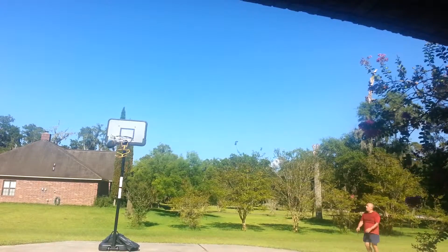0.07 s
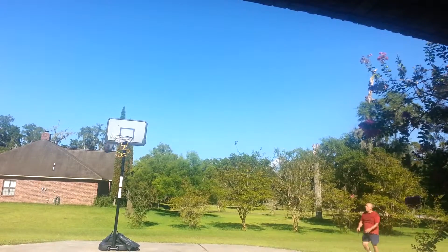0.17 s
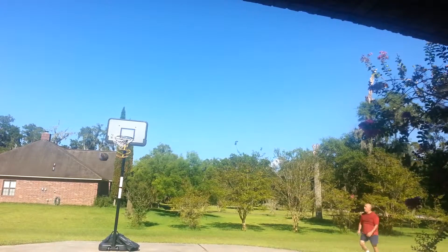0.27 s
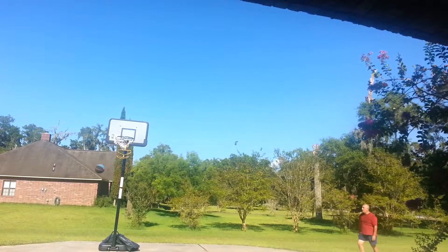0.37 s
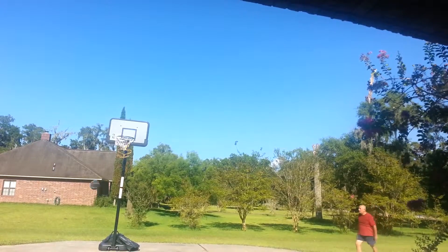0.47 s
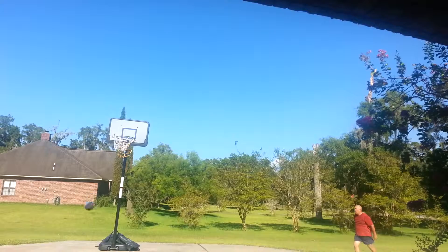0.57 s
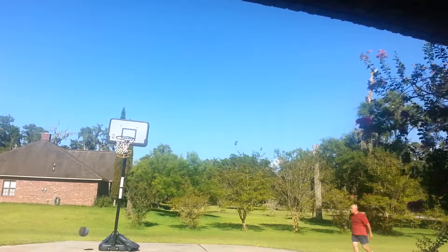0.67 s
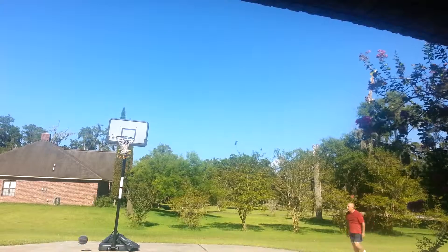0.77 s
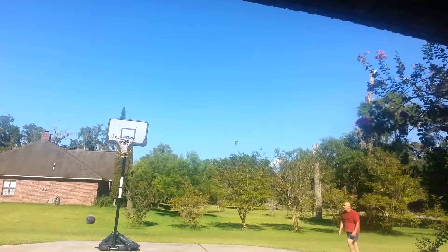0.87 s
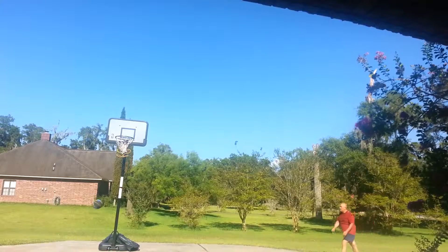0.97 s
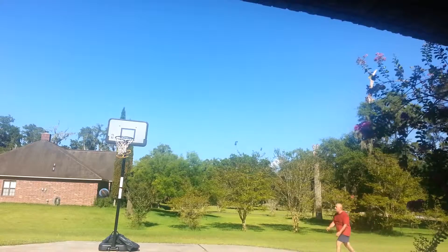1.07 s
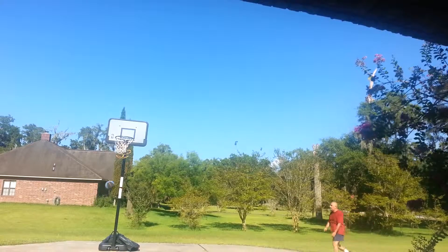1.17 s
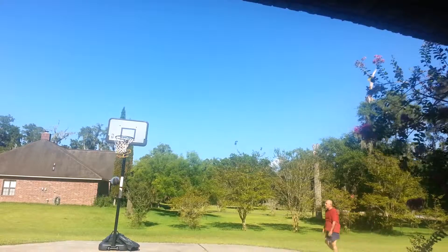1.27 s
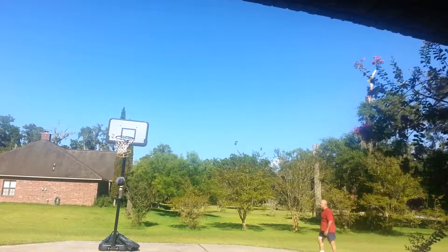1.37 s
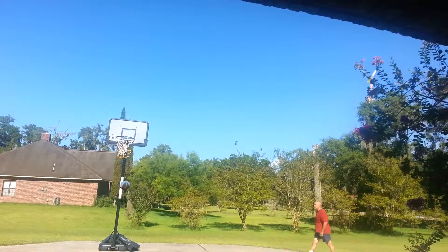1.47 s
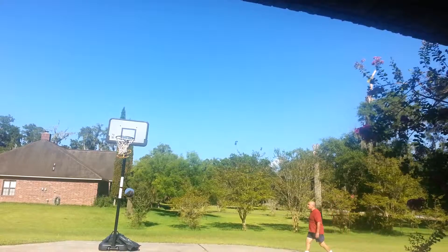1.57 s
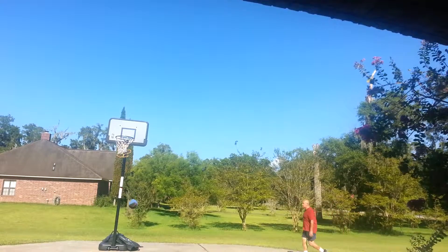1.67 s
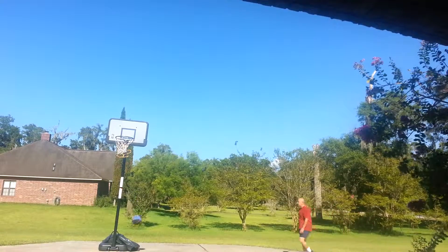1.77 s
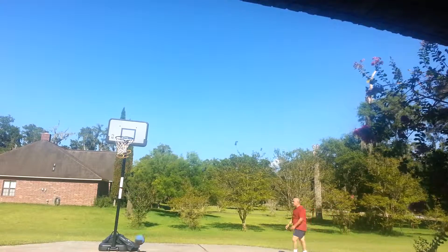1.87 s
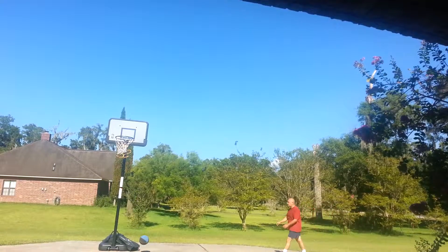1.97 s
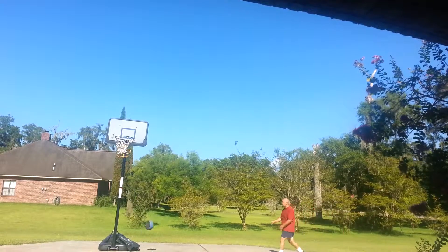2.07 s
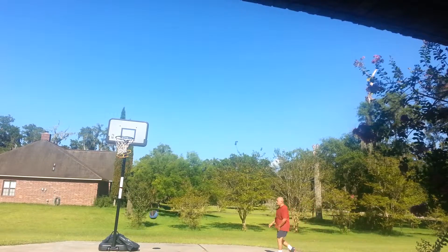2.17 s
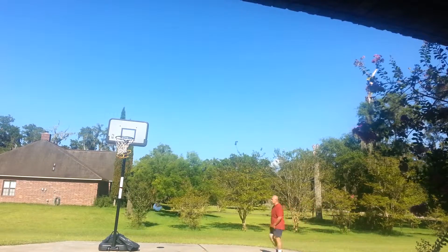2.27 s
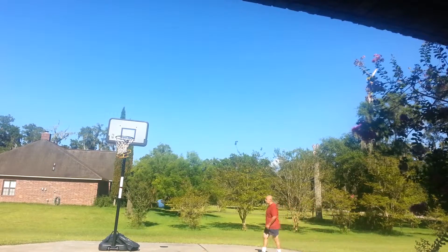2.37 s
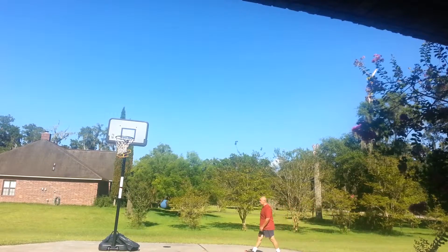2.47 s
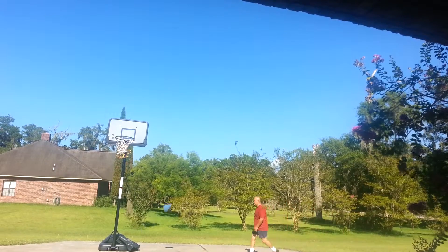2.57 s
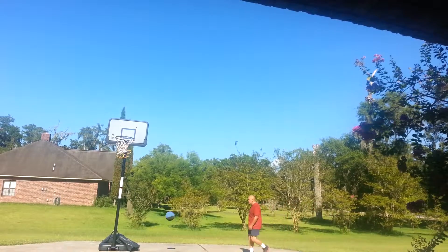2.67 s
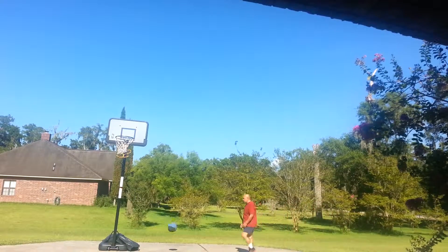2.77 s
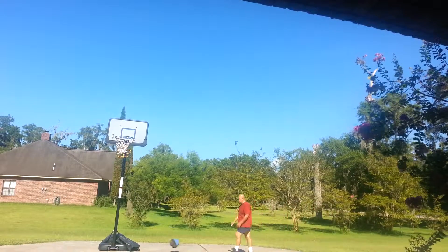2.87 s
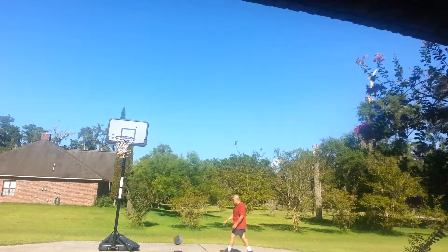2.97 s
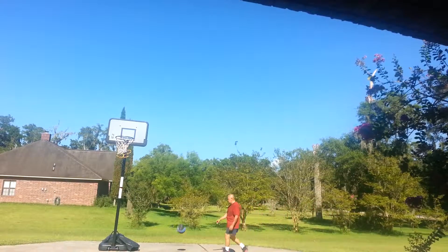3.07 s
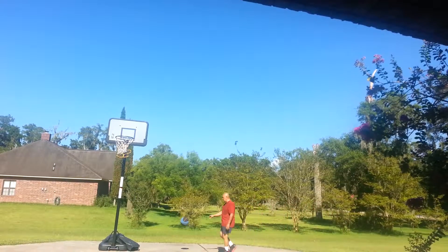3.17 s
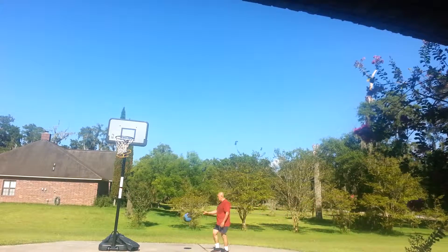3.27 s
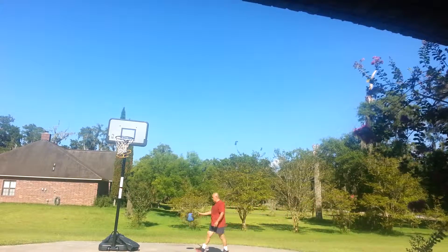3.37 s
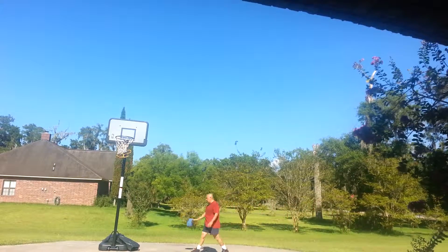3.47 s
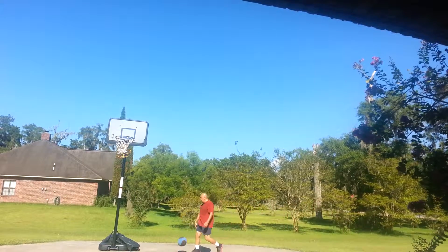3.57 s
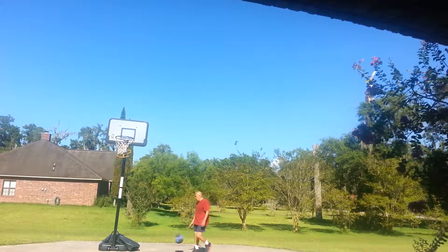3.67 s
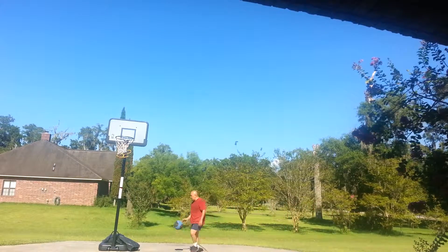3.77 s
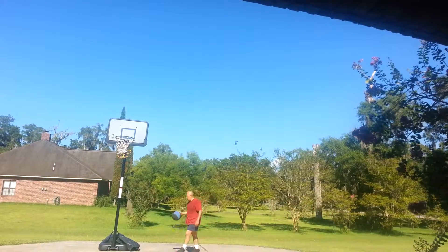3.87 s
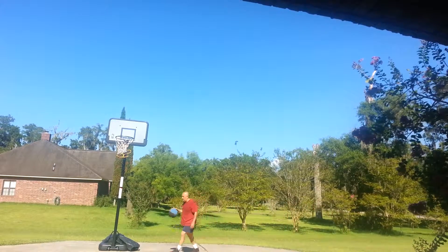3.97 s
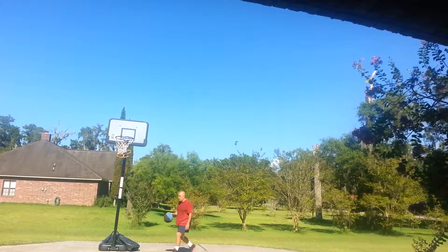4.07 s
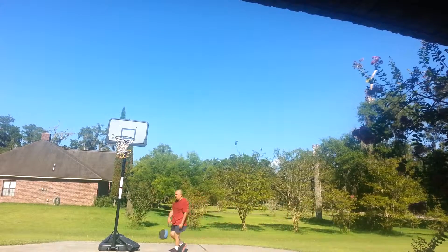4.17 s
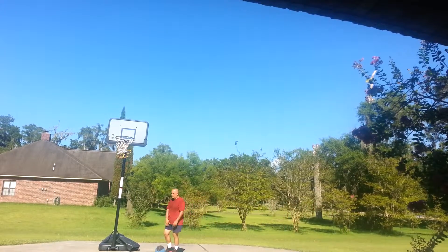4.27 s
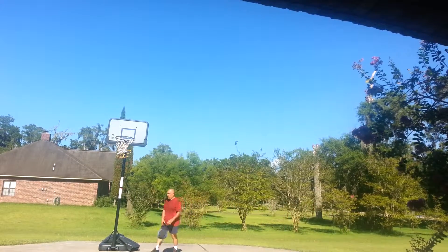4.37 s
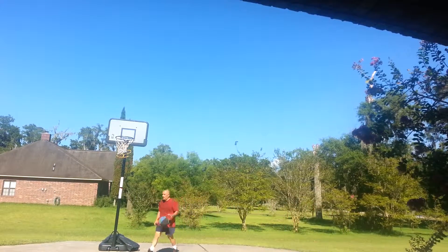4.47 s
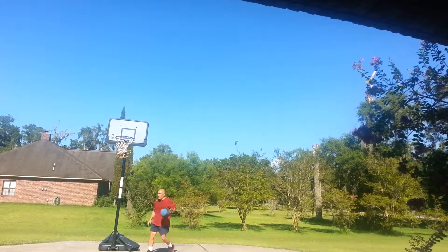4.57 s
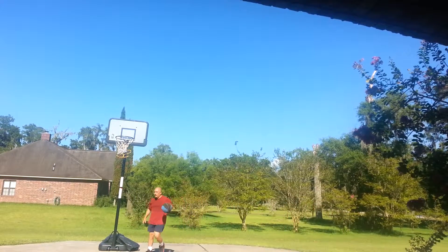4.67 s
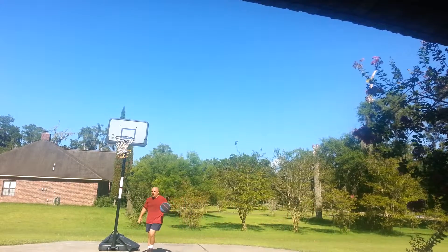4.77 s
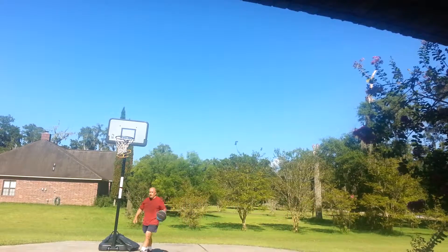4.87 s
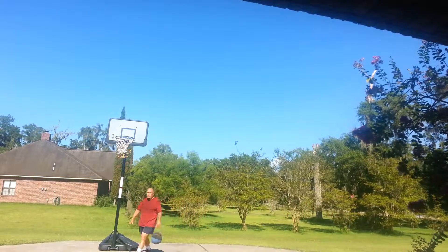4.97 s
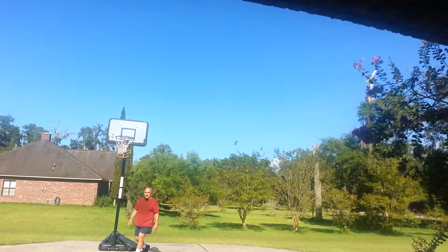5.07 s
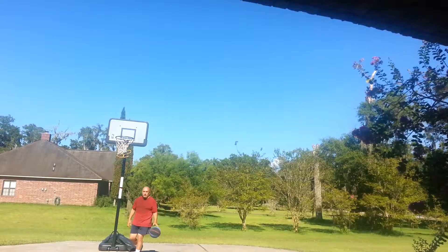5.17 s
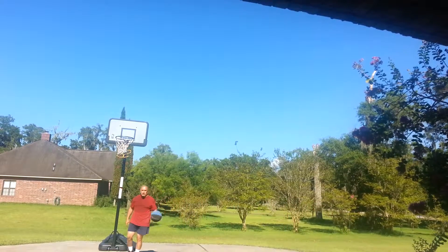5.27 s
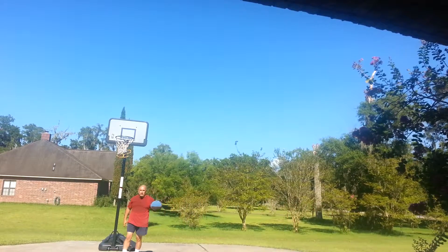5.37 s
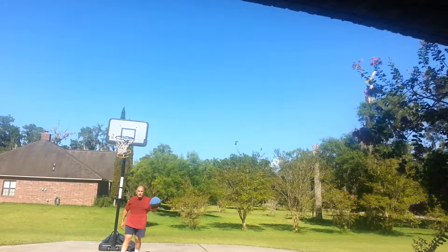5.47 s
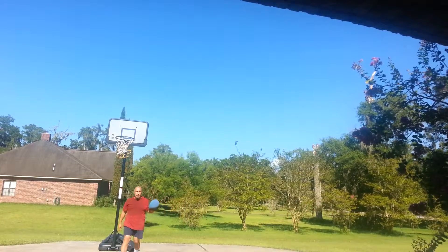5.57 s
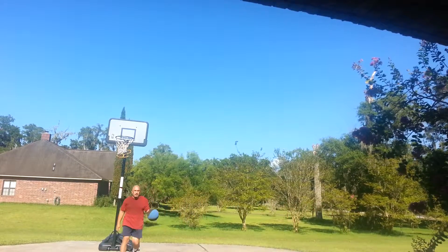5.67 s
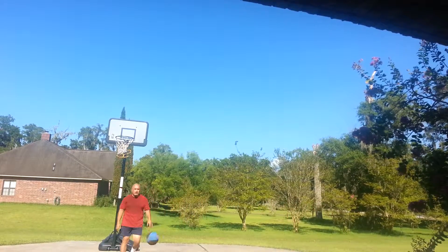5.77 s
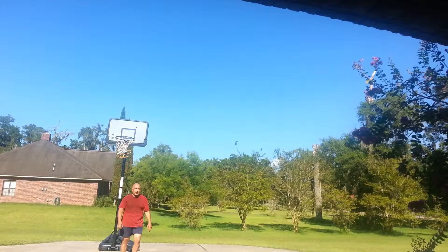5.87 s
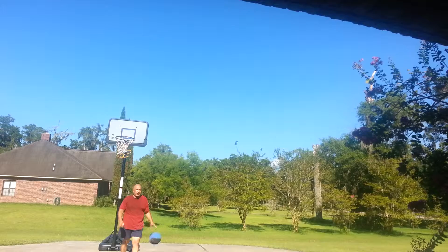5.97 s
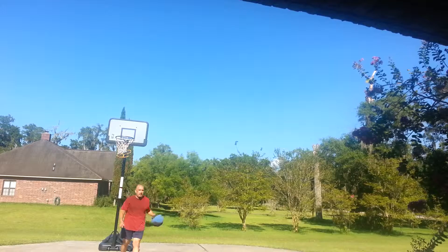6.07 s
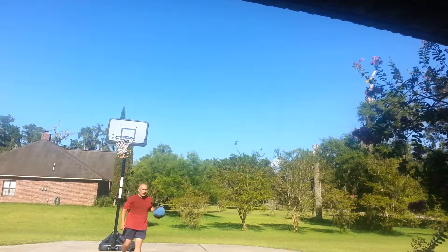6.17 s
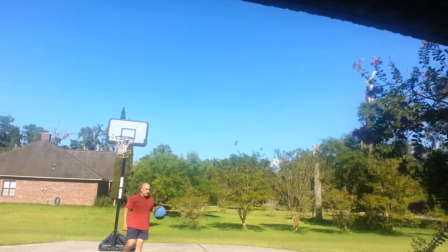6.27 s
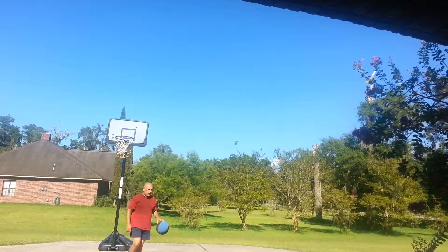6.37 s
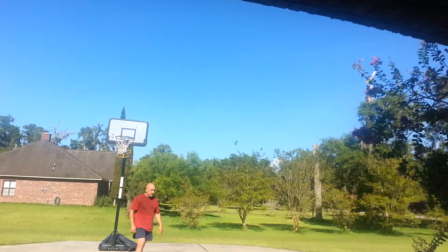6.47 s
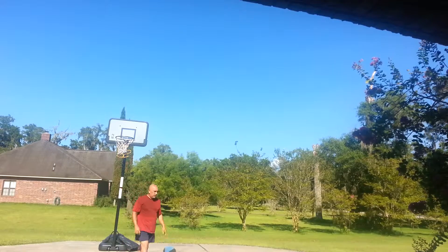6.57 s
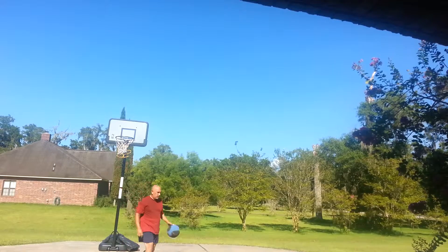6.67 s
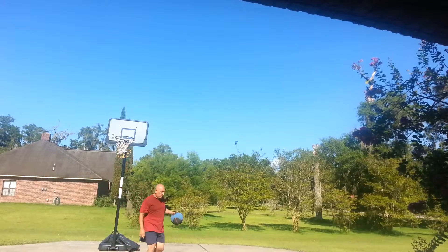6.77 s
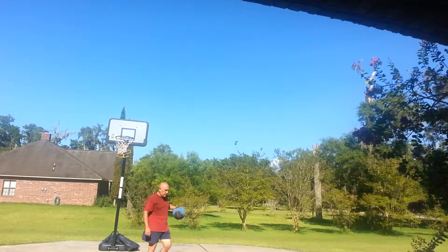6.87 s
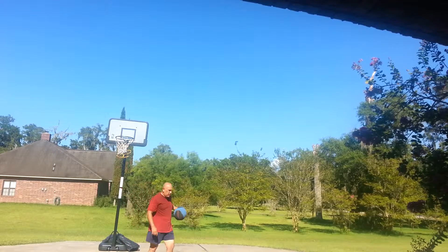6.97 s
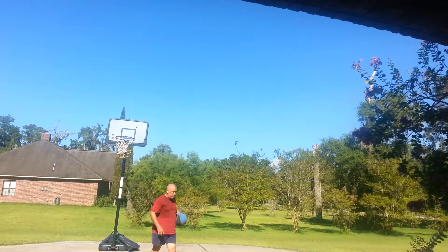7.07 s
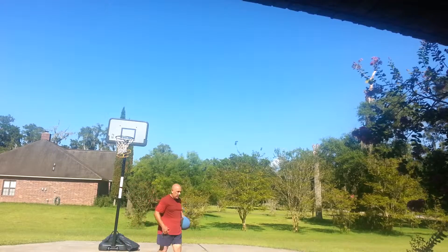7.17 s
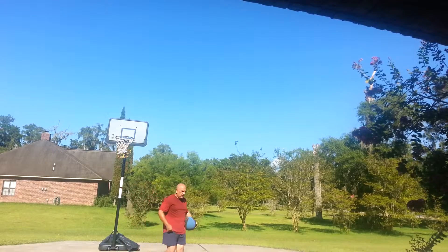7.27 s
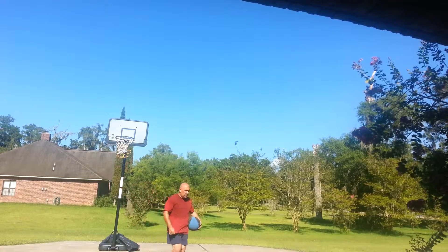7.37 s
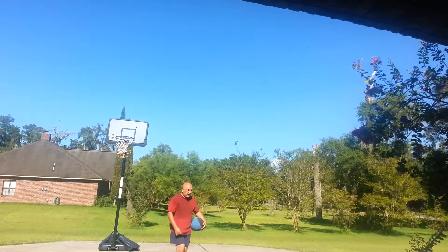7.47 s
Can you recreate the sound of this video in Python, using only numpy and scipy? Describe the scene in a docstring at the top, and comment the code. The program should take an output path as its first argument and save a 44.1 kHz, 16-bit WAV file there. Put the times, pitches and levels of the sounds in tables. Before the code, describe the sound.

Heard from under a carport, quiet outdoor air carries a faint distant motor and a thin high tone. A hoop clunks and rattles as a basketball hits it, and the ball falls to the concrete in slow, fading bounces. Light hand pats follow, then five louder, evenly paced dribbles come closer, each slapping, pinging and ringing briefly under the roof. Soft steps land near the end.

```python
"""Quiet outdoor air, a faint motor whine and a thin tone near 2.9 kHz are there from the start.
A basketball knocks the backboard and clips the steel rim, then drops on a concrete driveway just before
1 s. Each bounce is a slap of rubber with a ping of the air in the ball; a carport booms and rings behind
it. From 1.6 s a hand pats the ball between some bounces, and the sound dries as it is dribbled closer.
Soft steps land near 5.6 s and 6.8 s."""
import sys
import numpy as np
from scipy import signal
from scipy.fft import rfft, irfft
from scipy.io import wavfile
from scipy.ndimage import uniform_filter1d

SR = 44100
rng = np.random.default_rng(int(sys.argv[2]) if len(sys.argv) > 2 else 0)


def materialize(psi):
    """Save the field psi as 16-bit PCM at rate SR to the path in sys.argv[1].

    A 1-D psi becomes a single channel; in a 2-D psi each row is a channel.
    """
    bounded = np.clip(np.atleast_2d(psi).T, -1, 1)
    quanta = np.round(bounded * 32767).astype(np.int16)
    wavfile.write(sys.argv[1], SR, quanta)


N = 330730
SIZE = 65536  # samples in one hit; hits are built as spectra, where multiplying means filtering
HZ, AGE = np.fft.rfftfreq(SIZE, 1 / SR), np.arange(SIZE) / SR  # a hit's frequencies and seconds
LEFT_LAG_S = .00007  # the left microphone hears the driveway this much later


# bounces on the concrete: t/s, level/dB, treble tilt/(dB per octave), hollow band f/Hz, dull band f/Hz
BOUNCES = [ (0.8631, -17, 0, 790, 530), (2.046, -20, 0.07, 990, 230), (3.0353, -28, 0.2, 1320, 775),
           (3.7353, -17, -2.5, 1420, 470), (4.3791, -12.5, -2, 574, 4700), (5.1632, -15, -0.2, 855, 1510),
           (5.9742, -16, 1.84, 880, 1510), (6.6205, -17.5, 1.24, 760, 1730), ]

def ball(level_db=33, usual_db=-19.5, ping_db_per_tilt=1.8, drying_db_per_s=0.6335):
    """The skin slaps the concrete, the air inside pings, and the thump sets the carport booming."""
    out, ping_tones, boom_tones = np.zeros((2, N)), air_ping(), carport_boom()
    for s, db, tilt, hollow_hz, dull_hz in BOUNCES:
        slap = skin_slap(tilt, hollow_hz, dull_hz)
        ping = amp(ping_db_per_tilt * tilt) * ping_tones  # a crisper hit rings the air more
        thump = amp(-2 - 0.53 * (db - usual_db)) * boom_tones  # a harder one is more slap, less thump
        space = sound_paths() + amp(-0.22 - drying_db_per_s * s) * reverb()  # drier as the ball nears
        add(out, s, amp(db + level_db) * irfft((slap + ping) * space + thump))
    return out


# tone of the rubber skin's slap: f/Hz, level/dB
SLAP_TONE = [(30, -54), (45, -20), (60, -9), (100, -5), (220, 2.5), (420, -1.5), (900, -4.5), (1500, -3),
             (2600, -5), (3050, -11), (4700, -12), (6200, -22), (9000, -25), (11500, -31), (14000, -45)]

def skin_slap(tilt, hollow_hz, dull_hz, hollow_db=5, dull_db=-3, ripple_db=2.4, ripple_gap_hz=130):
    """Spectrum of one slap: each lands on another spot of the skin and favours other pitches."""
    treble_octaves = np.log2(1 + (HZ / 1200) ** 2) / 2  # the tilt acts above about 1200 Hz
    knots = np.arange(0, SR / 2 + ripple_gap_hz, ripple_gap_hz)
    above_thump = 1 - np.exp(-(HZ / 600) ** 2)
    ripple = ripple_db * above_thump * np.interp(HZ, knots, rng.standard_normal(len(knots)))
    colour = hollow_db * band(hollow_hz) + dull_db * band(dull_hz) + ripple
    return sharp_pulse(read(SLAP_TONE, HZ) + tilt * treble_octaves + colour)


# notes of the air inside the ball: f/Hz, level/dB, fade/s (the time to drop by 60 dB)
PING_NOTES = [(978, -60, 0.29), (1055, -58, 0.31), (1302, -56.5, 0.17), (1800, -87, 1), (1997, -61, 0.2),
              (2250, -61, 0.25), (2430, -75, 0.11), (2480, -80, 0.15)]

def air_ping(rest_hz=2945, flat_hz=80, settle_s=0.22, long_db=-74.5, fade_s=1.56):
    """Spectrum of the trapped air ringing, plus one long note that slides up a little as it dies."""
    pitch = rest_hz - flat_hz * np.exp(-AGE / settle_s)
    fade = np.exp(-np.log(1000) * AGE / fade_s)
    long_note = amp(long_db) * np.sin(2 * np.pi * np.cumsum(pitch) / SR) * fade
    return ring(PING_NOTES) + rfft(long_note)


# low notes of the space under the carport roof: f/Hz, level/dB, fade/s
BOOM_NOTES = [(63.4, -64.5, 0.66), (99.5, -43.5, 0.38), (130.95, -39, 0.17), (165.1, -38.5, 0.04),
              (203.4, -47.5, 0.19), (238.6, -64, 1), (351.7, -51, 0.59), (402, -49, 0.57),
              (537.5, -54.5, 0.59), (672, -51, 0.2), (806, -58.5, 0.69), (836, -47, 0.14)]

def carport_boom(late_s=0.0016):
    """Spectrum of the waves that swing to and fro under the roof just after a bounce."""
    return ring(BOOM_NOTES) * delay(late_s)


# notes of the backboard: f/Hz, level/dB, fade/s
BOARD_NOTES = [(408, 5.5, 0.07), (502, -1.5, 0.21), (552, 5.5, 0.038), (664, 7.5, 0.029), (870, 4, 0.028),
               (964, 12.5, 0.03), (1070, 12.5, 0.018), (1130, -9, 0.037), (1420, 9.5, 0.018)]
# knocks on the board: t/s, level/dB, top of the clatter f/Hz
BOARD_KNOCKS = [(.004, -3, 1100), (.016, -7.5, 1560), (.033, -2, 2740), (.348, -20.5, 696)]

def backboard(paths, board_db=-36, clatter_db=11, low_cut_hz=360):
    """The ball knocks the board, which clunks and rattles its fittings; the open panel sheds its bass."""
    out, clunk = np.zeros((2, N)), ring(BOARD_NOTES)
    space = amp(-2) * paths + amp(-5) * reverb()  # the hoop stays put, so all knocks echo alike
    for s, db, top_hz in BOARD_KNOCKS:
        knock = amp(board_db) * clunk + amp(clatter_db) * clatter(top_hz)
        add(out, s, amp(db) * irfft(knock * cut_bass(low_cut_hz) * space))
    return out


# notes of the steel rim: f/Hz, level/dB, fade/s
RIM_NOTES = [(2294, 7, 0.036), (2500, 9, 0.022), (3526, 7.5, 0.063), (4689, -5.5, 0.16), (5803, -26, .08),
             (7360, -17, .03), (8600, -11, .03), (9400, -15, .03), (11130, -7, .02)]
# touches on the rim: t/s, level/dB
RIM_CLINKS = [(.175, -1), (.190, -8.5)]

def rim(paths, ring_db=-47, clatter_db=-11):
    """The ball clips the steel rim, which rings with a thin, bright clatter."""
    out, steel = np.zeros((2, N)), ring(RIM_NOTES)
    space = paths + amp(1) * reverb()
    for s, db in RIM_CLINKS:
        clink = amp(ring_db) * steel + amp(clatter_db) * clatter(top_hz=9000)
        add(out, s, amp(db) * irfft(clink * space))
    return out


def clatter(top_hz, bottom_hz=850, rattle_s=.013):
    """Spectrum of the hoop's loose fittings, shaken once."""
    return scatter(rattle_s) * (1 - cut_treble(bottom_hz)) * cut_treble(top_hz) ** 2


# the hand meets the ball: t/s, level/dB
HAND_PATS = [(1.61, -10.5), (2.597, -7), (3.540, -5), (3.557, 1.5), (5.601, -4.5)]

def hands(paths, palm_db=-1, fingers_db=-9, contact_s=0.0021, reverb_db=-4):
    """The palm gives the ball a low push while the fingers smack its skin."""
    out = np.zeros((2, N))
    palm = amp(palm_db) * thud(pitch_hz=380, top_hz=560)
    for s, db in HAND_PATS:
        fingers = amp(fingers_db) * thud(pitch_hz=700, top_hz=1900) * scatter(contact_s)
        space = paths + amp(reverb_db) * reverb()
        add(out, s, amp(db) * irfft((palm + fingers) * space))
    return out


# dull footfalls: t/s, level/dB
FOOTFALLS = [(5.552, 0), (5.574, -1), (6.839, -7)]

def feet(paths, level_db=7.5, reverb_db=-14):
    """Soft soles land on the concrete."""
    out, sole = np.zeros((2, N)), thud(pitch_hz=150, top_hz=210)
    for s, db in FOOTFALLS:
        space = paths + amp(reverb_db) * reverb()
        add(out, s, amp(db + level_db) * irfft(sole * space))
    return out


# echoes from roof, posts and walls: delay t/s, level/dB
ECHOES = [(.0028, -12), (.0038, -11.5), (.0053, -11.5), (0.01, -12.5), (0.0135, -6.5), (0.032, -21),
          (0.0398, -37), (0.064, -11.5)]

def sound_paths(smooth_hz=900, top_hz=7000, rough_s=0.0011, spread_s=0.000097):
    """Spectra of the straight path and single echoes: long waves bounce off whole, short ones scatter."""
    straight = np.array([delay(round(LEFT_LAG_S * SR) / SR), delay(0)])
    lags = rng.uniform(-spread_s, spread_s, len(ECHOES))
    whole, echoes = cut_treble(smooth_hz), 0
    for (s, db), lag in zip(ECHOES, lags):
        surface = whole + (1 - whole) * scatter(rough_s)
        echoes = echoes + amp(db) * surface * np.array([delay(s + lag), delay(s - lag)])
    return straight + echoes * cut_treble(top_hz)


# tone of the carport's reverb: f/Hz, level/dB
REVERB_TONE = [(40, 3), (100, 6.5), (200, 13), (290, -1.5), (400, 7.5), (620, 4.5), (800, 8), (1000, 7),
               (1500, 5), (2500, 7.5), (5000, 4.5), (8000, 5.5), (13000, 0)]
# how long it lingers: f/Hz, fade/s
REVERB_FADE = [(60, 0.23), (200, 0.43), (500, 0.65), (1000, 0.57), (2500, 0.56), (5000, 0.66),
               (12000, 0.68)]
# how alike its left and right sides are: f/Hz, likeness (1 = the same)
REVERB_LIKENESS = [(100, 1), (250, 0.86), (500, .55), (1000, -0.043), (2000, -0.14), (4000, 0.024),
                   (10000, -0.011)]

def reverb(build_s=0.0018):
    """Spectra of the carport's many echoes blurred into fading noise, new for each place of the ball."""
    hz, t, noise = signal.stft(irfft(noise_pair(REVERB_LIKENESS, SIZE)), SR, nperseg=512)
    fall = np.log(1000) / read(REVERB_FADE, hz)[:, None]
    fade = np.exp(-fall * t) * np.sqrt(2 * fall / SR)  # same energy, long or short
    shaped = noise * amp(read(REVERB_TONE, hz))[:, None] * fade
    tail = signal.istft(shaped, SR, nperseg=512)[1][:, :SIZE]
    return rfft(tail * (1 - np.exp(-AGE / build_s)))


# tone of the outdoor air: f/Hz, level/dB
AIR_TONE = [(25, 11.5), (50, 3.5), (90, 7.5), (170, 3.5), (300, 0), (480, -2), (1000, -7), (2200, -12.5),
            (2800, -11.5), (3200, -14), (6300, -21.5), (8300, -21), (9500, -17.5), (14400, -20.5)]
# how alike its left and right sides are: f/Hz, likeness
AIR_LIKENESS = [(30, 1), (100, 0.59), (250, 0.38), (500, 0.37), (1000, 0.18), (2000, 0.0), (12000, 0.073)]

def outdoor_air(level_db=-51.5, patchy_db=0.2):
    """A distant outdoor wash that drifts very slightly, in soft patches."""
    hz, _, noise = signal.stft(irfft(noise_pair(AIR_LIKENESS, N), N), SR, nperseg=2048)
    patches = uniform_filter1d(rng.standard_normal(noise.shape), size=14, axis=0)
    patches = uniform_filter1d(patches, size=6, axis=1)
    shaped = noise * amp(read(AIR_TONE, hz)[:, None] - patchy_db * patches / patches.std())
    wash = signal.istft(shaped, SR, nperseg=2048)[1][:, :N]
    return amp(level_db) * wash / wash.std()


# tones of a distant motor, plus one faint high tone near 2.9 kHz (last row): multiple of base_hz, level/dB
FAINT_TONES = [(8, -71), (42, -86), (43, -83), (44, -84), (45, -83), (48, -78.5), (49, -84)]

def motor_and_high_tone(base_hz=59.33, waver_hz=2.38):
    """A distant motor hums and whines, and one faint tone sounds near 2.9 kHz; all waver a little."""
    out, t = np.zeros((2, N)), np.arange(N) / SR
    knots = np.arange(0, N / SR + 1, .1)
    for multiple, db in FAINT_TONES:
        hz = multiple * base_hz
        pitch = hz + waver_hz * np.interp(t, knots, rng.standard_normal(len(knots)))
        arrival_s = rng.uniform(-LEFT_LAG_S, LEFT_LAG_S, (2, 1))
        out += amp(db) * np.sqrt(2) * np.sin(2 * np.pi * (np.cumsum(pitch) / SR + hz * arrival_s))
    return out


def amp(db):
    """Turns decibels into a number to multiply by."""
    return 10 ** (np.asarray(db) / 20)


def read(points, hz):
    """Looks up hz in a table, joining its points with lines on an octave scale."""
    f, value = np.transpose(points)
    return np.interp(np.log(hz + 1), np.log(f + 1), value)


def add(mix, s, sound):
    """Mixes a stereo sound in at time s."""
    part = mix[:, max(round(s * SR), 0):][:, :sound.shape[1]]
    part += sound[:, :part.shape[1]]


def sharp_pulse(db):
    """Spectrum of the most sudden pulse that has these levels."""
    log_gain = np.log(amp(np.maximum(db, -100)))
    mirrored = np.concatenate([log_gain, log_gain[-2:0:-1]])
    return np.exp(np.conj(signal.hilbert(mirrored)))[:len(db)]


def ring(notes):
    """Spectrum of notes that are struck together and die away."""
    return rfft(sum(amp(db) * np.sin(2 * np.pi * hz * AGE) * np.exp(-np.log(1000) * AGE / fade_s)
                    for hz, db, fade_s in notes))


def thud(pitch_hz, top_hz):
    """Spectrum of one soft push that dies at once."""
    return cut_bass(pitch_hz) * cut_treble(top_hz) ** 2


def scatter(spread_s):
    """Spectrum of one sharp blow broken up over a rough surface."""
    burst = rng.standard_normal(SIZE) * np.exp(-AGE / spread_s)
    return rfft(burst / np.linalg.norm(burst))


def band(hz, octaves=0.31):
    """A soft bump of height 1 around one frequency."""
    return np.exp(-(np.log2((HZ + 1) / hz) / octaves) ** 2)


def cut_bass(hz):
    """A filter that weakens everything below hz."""
    u = 1j * HZ / hz
    return u ** 2 / (1 + u + u ** 2)


def cut_treble(hz):
    """A filter that gently weakens everything above hz."""
    return 1 / (1 + 1j * HZ / hz)


def delay(s):
    """A filter that makes a sound s seconds late."""
    return np.exp(-2j * np.pi * HZ * s)


def noise_pair(likeness, size):
    """Spectra of white noise at two close microphones, alike in the bass."""
    a, b = rfft(rng.standard_normal((2, size)))
    same = np.clip(read(likeness, np.fft.rfftfreq(size, 1 / SR)), -1, 1)
    mid, side = a * np.sqrt((1 + same) / 2), b * np.sqrt((1 - same) / 2)
    return np.array([mid + side, mid - side])


def scene():
    """Everything as heard from under the carport roof."""
    paths = sound_paths()
    play = ball() + backboard(paths) + rim(paths) + hands(paths) + feet(paths)
    return play + outdoor_air() + motor_and_high_tone()


def record(dry, bottom_hz=68, top_hz=14560):
    """The microphones shed deep bass, peaks stop at full scale, and the highest treble is cut."""
    lean = signal.sosfilt(signal.butter(4, bottom_hz, "highpass", fs=SR, output="sos"), dry)
    low_pass = signal.firwin(801, top_hz, window=("kaiser", 9), fs=SR)
    return signal.oaconvolve(np.clip(lean, -1, 1), low_pass[None], "same")


dry = scene()
out = record(dry)
materialize(out)
```